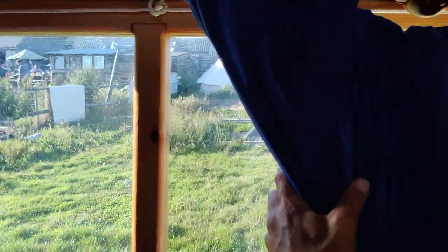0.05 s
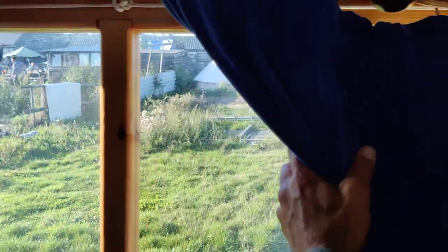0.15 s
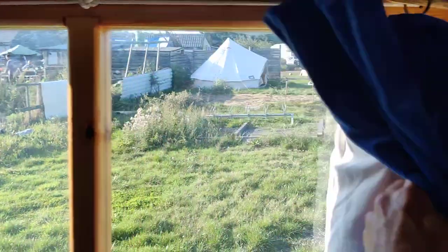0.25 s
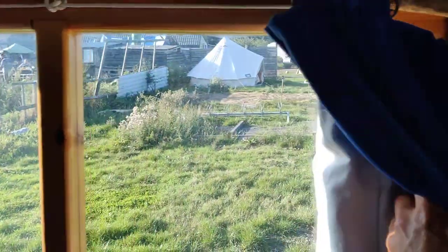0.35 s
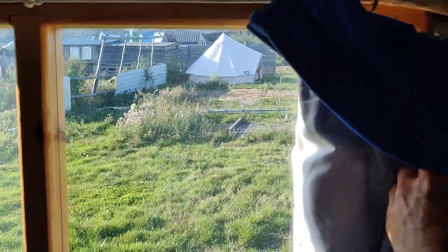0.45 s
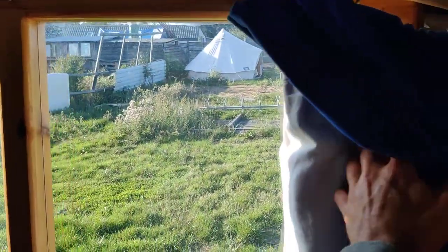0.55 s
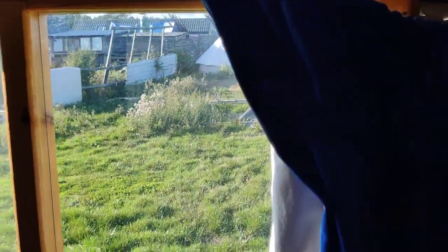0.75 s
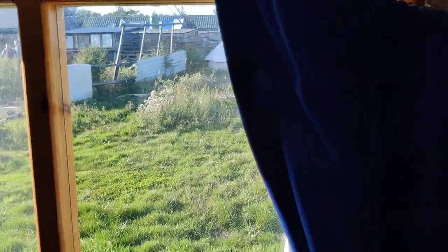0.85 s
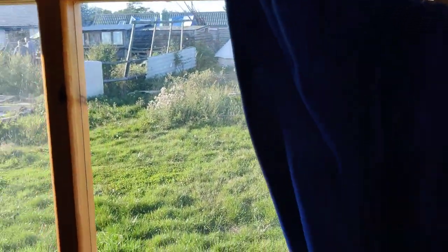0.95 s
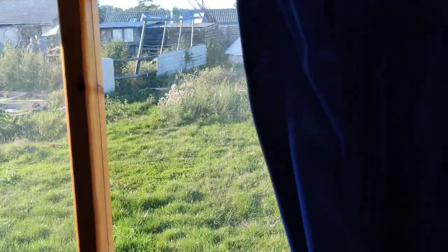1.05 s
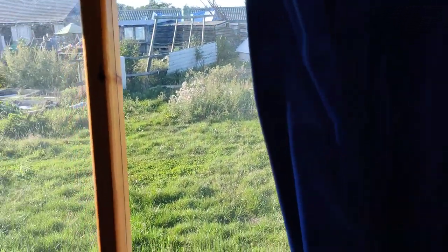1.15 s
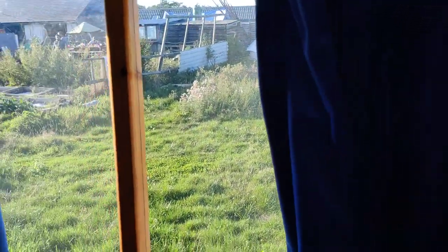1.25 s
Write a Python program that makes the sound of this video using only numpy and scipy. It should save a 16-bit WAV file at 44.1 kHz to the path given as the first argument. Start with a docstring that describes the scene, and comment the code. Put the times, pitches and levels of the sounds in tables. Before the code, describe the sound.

A curtain is pulled open close by in a small, dead room. Cloth swishes softly from 0.1 s with a light tug; at 0.2-0.38 s hooks scrape along the wooden pole with low rumble and thuds, metal clashing rapidly from 0.25 to 0.36 s. Small squeaky ticks follow at 0.41-0.5 s, with stray ones at 0.7 and 0.95 s. Faint fabric rustle fades by 1.1 s into quiet air, stirring slightly at the end.

```python
"""A curtain is pulled open, close by, in a small, dead room.
Cloth swish and low rumble (filtered noise) come first; then hooks scrape along a wooden pole (random jerks).
Tugs thud in the pole (dying sines), and the metal hooks clash as they bunch up (crack, chatter, ring, knock).
Hooks tick as they settle (short falling squeaks with a knock), while single folds snap or drag (noise bursts).
Still air (filtered noise) lies under it all."""
import sys
import numpy as np
from scipy import signal
from scipy.fft import rfft, irfft, next_fast_len
from scipy.io import wavfile
from scipy.ndimage import uniform_filter1d

SR = 44100
rng = np.random.default_rng(int(sys.argv[2]) if len(sys.argv) > 2 else 0)


def to_wav(sig):
    """Store sig (one row per channel, or 1-D mono) as 16-bit WAV at the path in sys.argv[1].

    Samples outside -1..1 are clipped; the rate is SR.
    """
    pcm = np.clip(np.atleast_2d(sig), -1, 1) * 32767
    pcm = np.round(pcm).astype(np.int16)
    wavfile.write(sys.argv[1], SR, pcm.T)  # frames by channels


N = 57330


def undb(db):
    """Decibels to gain."""
    return 10 ** (np.asarray(db) / 20)


def unit(x):
    """Scale to rms 1."""
    return x / np.sqrt(np.mean(x ** 2))


def clock():
    """Time of every sample in seconds."""
    return np.arange(N) / SR


def curve(rows):
    """Gain through points of (s, dB), linear in dB."""
    return undb(np.interp(clock(), *np.array(rows).T))


def decay(t60_s):
    """Envelope that falls 60 dB in t60_s."""
    return np.exp(-np.log(1000) * clock() / t60_s)


def pan(db):
    """Left and right gains; positive is louder on the left."""
    return undb(np.array([[db], [-db]]) / 2)


def convolve(x, response):
    """Play x through a response."""
    return signal.fftconvolve(np.atleast_2d(x), np.atleast_2d(response), axes=-1)[:, :N]


def colour(x, points):
    """Minimum-phase filter through points of (Hz, dB), by folding the cepstrum to positive time."""
    hz, db = np.array(points).T
    size = 2 * next_fast_len(N)
    bin_hz = np.maximum(np.arange(size // 2 + 1) * SR / size, 1)
    gain_db = np.interp(np.log(bin_hz), np.log(hz), db)
    cepstrum = irfft(np.log(undb(gain_db)))
    cepstrum[1:size // 2] *= 2
    cepstrum[size // 2 + 1:] = 0
    response = np.exp(rfft(cepstrum))
    return irfft(rfft(x, size) * response, size)[..., :N]


def blow(s):
    """A unit impulse at time s."""
    return 1. * (np.arange(N) == int(s * SR))


def noise():
    """Unrelated noise left and right."""
    return rng.standard_normal((2, N))


def burst(envelope):
    """Noise of unit energy under an envelope."""
    return unit(noise() * envelope) / np.sqrt(N)


def walk(rate_hz):
    """Random wander about zero, rms near 1, with rate_hz new values a second joined smoothly."""
    hold = int(SR / rate_hz)
    steps = np.repeat(rng.standard_normal(N // hold + 1), hold)
    return unit(uniform_filter1d(steps, hold)[:N])


def mode(hz, t60_s):
    """A dying sine; the higher it is, the more its phase differs between the sides."""
    diffuse_hz = 2310  # from here up the two phases are unrelated
    phase_turns = min(hz / diffuse_hz, 1) ** 2 * rng.random((2, 1))
    return decay(t60_s) * np.sin(2 * np.pi * (hz * clock() + phase_turns))


def ports(x):
    """The sound reaches the right side just after the left."""
    lag_s = 0.00016
    return np.array([x, np.roll(x, int(lag_s * SR))])


def pole_ring():
    """The pole and its frame ring in dying modes; those above the knee die faster."""
    # Each row: frequency in Hz, relative level in dB.
    pole_modes = [(110, -4.5), (137, 6.5), (428, 4.5), (464, 1), (683, -4), (1020, -2.5), (1245, -1),
                  (1372, -11), (1750, -8.5), (2230, -5)]
    t60_s, knee_hz = 0.099, 510
    return sum(undb(db) * mode(hz, t60_s * min(knee_hz / hz, 1) ** .5) for hz, db in pole_modes)


def still_air():
    """Steady filtered noise of the still air."""
    # Colour. Each row: frequency in Hz, gain in dB.
    air_colour = [(50, 4), (200, -11), (600, -25), (2000, -28.5), (11000, -41), (15000, -50.5)]
    air_db = -78
    return unit(colour(noise(), air_colour)) * undb(air_db)


def cloth():
    """Folds brush past each other: a grainy swish of noise whose level follows the cloth movement."""
    # Cloth movement. Each row: time in seconds, relative level in dB.
    movement = [(0, -19.5), (.09, -10), (.115, 6.5), (.15, -14), (.2, 5), (.37, -6), (.42, 5), (.55, -2),
                (.72, -1), (.90, 0), (.97, -11.5), (1.1, -20.5), (1.26, -18), (1.275, -8)]
    # Colour. Each row: frequency in Hz, gain in dB.
    swish_colour = [(90, -9), (250, -8.5), (450, 2), (1300, -4), (1900, -5), (4000, -7), (8000, -16.5),
                    (15000, -17)]
    cloth_db, grain_db, grain_hz = -65.5, 2, 1500
    fibres = noise() * undb(grain_db * walk(grain_hz))
    return unit(colour(fibres, swish_colour)) * curve(movement) * undb(cloth_db)


def rumble():
    """Low buffeting from the swinging curtain and the frame, nearly alike on both sides."""
    # Stirred air and frame. Each row: time in seconds, relative level in dB.
    rumble_curve = [(0, -59.5), (.09, -55.5), (.12, -47.5), (.2, -46), (.235, -27), (.31, -30.5),
                    (.34, -33), (.385, -32), (.415, -40), (.54, -47.5), (.63, -46.5), (.9, -52.5),
                    (1.22, -64), (1.27, -51.5)]
    # Colour. Each row: frequency in Hz, gain in dB.
    rumble_colour = [(12, -21), (24, 0), (39, 0.5), (76, -14.5), (112, -15.5), (190, -23.5), (400, -33),
                     (900, -58)]
    rumble_db, side_db = -2.5, -12.5
    gusts = colour(noise(), rumble_colour)
    power = uniform_filter1d(gusts ** 2, size=SR // 8)
    mid, side = gusts / np.sqrt(power)  # evens out the level
    both = mid + undb(side_db) * np.array([side, -side])
    return both * curve(rumble_curve) * undb(rumble_db)


def scrape(pole):
    """Hooks stick and slip on the wood: uneven little jerks come in surges, rasp and ring the pole."""
    # Sliding effort. Each row: time in seconds, relative level in dB.
    effort = [(.06, -56), (.108, -32.5), (.117, -22), (.135, -30), (.21, -23), (.225, -12), (.25, -8),
              (.28, -1), (.328, -3.5), (.372, -10), (.39, -39.5), (.47, -61), (.54, -60.5)]
    # Colour of the rasp. Each row: frequency in Hz, gain in dB.
    rasp_colour = [(100, -10.5), (280, -6), (450, -0.5), (800, -2), (1400, -6), (2400, -14), (4500, -17),
                   (8000, -30), (15000, -35)]
    slips_per_s, scatter_db = 1500, 3
    surges_per_s, surge_db = 110, 0.5
    rasp_db, pole_db = -31.5, -35
    strength = undb(scatter_db * np.clip(rng.standard_normal(N), -2, 2))
    slips = (rng.random(N) < slips_per_s / SR) * strength
    signs = np.sign(rng.standard_normal(N))
    slips = unit(slips * signs * undb(surge_db * walk(surges_per_s)))
    grit = ports(slips) + slips * noise()
    rasp = unit(colour(grit, rasp_colour)) * curve(effort) * undb(rasp_db)
    body = convolve(slips * curve(effort), unit(pole) / np.sqrt(N)) * undb(pole_db)
    return (rasp + body) * pan(db=2.5)


def bumps(pole):
    """Tugs of the curtain are soft pushes that ring mainly the low modes of the pole."""
    # Each row: time in seconds, relative level in dB.
    tugs = [(0.117, -1.5), (0.2212, 11), (0.2582, 12.5), (.312, 9)]
    # Colour of a push. Each row: frequency in Hz, gain in dB.
    push_colour = [(130, -1.5), (450, -7), (2200, -15)]
    bump_db = -44
    pushes = sum(undb(db) * blow(s) for s, db in tugs)
    return convolve(colour(pushes, push_colour), pole) * undb(bump_db) * pan(db=1.5)


def chatter():
    """A quick, uneven run of recontacts with unit energy, held in strength before dying away."""
    contacts_per_s, hold_s, t60_s = 2200, 0.0054, 0.012
    contacts = (rng.random((2, N)) < contacts_per_s / SR) * np.sign(noise())
    envelope = np.minimum(decay(t60_s) * undb(60 * hold_s / t60_s), 1)
    return unit(contacts * envelope) / np.sqrt(N)


def knock(pole, contact):
    """A hook strikes the wood: a short clack and the ring of the pole."""
    # Colour of the clack. Each row: frequency in Hz, gain in dB.
    clack_colour = [(120, -11), (270, -19.5), (440, 6), (680, -2.5), (1100, -1), (1500, -2.5), (2200, 2),
                    (3700, -7), (5000, -27.5), (12000, -45.5)]
    pole_db = -41
    return colour(contact, clack_colour) + undb(pole_db) * pole


def hook_ring(note_hz):
    """A struck hook rings in modes that all hooks share, slightly detuned, and in its own note."""
    # Each row: frequency in Hz, relative level in dB, 60 dB decay in seconds.
    hook_modes = [(2093, -11.5, .08), (2982, -9, 0.043), (3530, -13, 0.03), (3630, -8, .04),
                  (4298, -11.5, 0.04), (4440, -8.5, 0.0046), (5970, -14.5, 0.0095), (6854, -3, 0.014),
                  (8320, -9.5, 0.0086), (11570, -4, 0.021), (11750, -11, 0.024), (12460, -1, 0.0068)]
    detune_share, scatter_db = 0.0037, 3.5  # random spread: no two hooks or points of contact are alike
    note_db, note_t60_s = 5.5, 0.024
    ring = undb(note_db) * mode(note_hz, note_t60_s)
    for hz, db, t60_s in hook_modes:
        gain = undb(db + scatter_db * rng.standard_normal())
        ring = ring + gain * mode(hz * (1 + detune_share * rng.standard_normal()), t60_s)
    return ring


def hooks(pole):
    """Each clash is a crack, a short chatter of recontacts, the ring of the hook and a knock on the pole."""
    # Each row: start in seconds, level in dB, brightness in dB, own note of the hook in Hz,
    # ring in dB, knock on the pole in dB, left-right balance in dB (levels are relative).
    clashes = [(.2536, -9, -14.5, 3540, 6.5, 14, -5.5), (.2679, -16.5, 1.5, 2430, -7.5, 20.5, 2.5),
               (.2764, -12, -5.5, 3200, -5, 12, 0), (.2878, -11, -9.5, 4280, -9.5, 7.5, 0),
               (.3012, 0.5, -7, 5852, -1.5, -14, 5.5), (.3074, -5.5, -20, 4075, -1.5, 0, 1.5),
               (0.3124, -20.5, -13, 3054, -9.5, 21.5, 0), (.3246, 1.5, -2.5, 4307, -3, -4, 5),
               (.3278, -8, 2.5, 3997, 8.5, -6, -0.5), (.3296, -13, 11, 4023, 0.5, -2.5, -1),
               (.3351, -8.5, -5, 3890, 11, -1, 0), (.3468, -10.5, -9.5, 3665, -6.5, 3.5, -3),
               (.3598, -8.5, -2.5, 3305, -0.5, 1, 0)]
    # Colour of the contact. Each row: frequency in Hz, gain in dB.
    crack_colour = [(150, -20), (500, -10), (1200, 3), (2400, 1), (3600, 5), (6000, -3.5), (7600, -10),
                    (9800, -17), (12300, -8.5), (15500, -13)]
    # Balance of the metal. Each row: frequency in Hz, left over right in dB.
    metal_pan = [(300, 14), (1500, -4), (4000, 2.5), (7500, 11), (10000, 15), (13000, 2.5)]
    # Brightness shelf: start and end of its slope in Hz.
    shelf_hz = (6500, 11500)
    crack_db, chatter_db, ring_base_db = -2.5, 6.5, -22
    knock_base_db, knock_chatter_db = -.5, -2.5
    out = 0
    for s, db, bright_db, note_hz, ring_db, knock_db, pan_db in clashes:
        contact = undb(crack_db) * ports(blow(0)) + undb(chatter_db) * chatter()
        metal = colour(contact, crack_colour) + undb(ring_base_db + ring_db) * hook_ring(note_hz)
        metal = np.array([colour(channel, [(hz, sign * balance_db / 2) for hz, balance_db in metal_pan])
                          for channel, sign in zip(metal, (1, -1))])
        wood_contact = ports(blow(0) + undb(knock_chatter_db) * chatter()[0])
        wood = undb(knock_base_db + knock_db) * knock(pole, wood_contact)
        push = colour(undb(db) * blow(s), [(shelf_hz[0], 0), (shelf_hz[1], bright_db)])
        out = out + convolve(push, metal + wood) * pan(pan_db)
    return out


def ticks(pole):
    """Hooks damped by the hanging cloth slip one by one: a tiny falling squeak and a clean knock on the pole."""
    # Each row: start in seconds, relative level in dB, final pitch in Hz, relative knock on the pole in dB.
    settling = [(0.4096, -11.5, 2970, 2.5), (0.4241, -13.5, 2890, 1.5), (0.439, -12, 2970, 3),
                (0.4541, -13, 3050, 5), (0.4730, -13, 2900, 3.5), (0.5001, -14, 2960, 8),
                (0.698, -19, 2910, 0.5), (0.9475, -21.5, 3720, -7)]
    squeak_db, length_s, attack_s, pan_db = -35.5, 0.0033, 0.00082, -11
    upper_hz, upper_db, knock_base_db = 6700, -11, -12.5
    glide_share, glide_s = 0.52, 0.00058  # starts sharp by this share and falls to its pitch
    t = clock()
    rise = np.minimum(t / attack_s, 1) ** 2
    envelope = rise * np.exp(-(t / length_s) ** 4)
    radians_per_hz = 2 * np.pi * (t + glide_share * glide_s * (1 - np.exp(-t / glide_s)))
    upper = undb(upper_db) * np.sin(2 * np.pi * upper_hz * t)
    tap = knock(pole, ports(blow(attack_s)))
    out = 0
    for s, db, hz, knock_db in settling:
        squeak = envelope * (np.sin(hz * radians_per_hz) * pan(pan_db) + upper)
        tick = undb(squeak_db) * squeak + undb(knock_base_db + knock_db) * tap
        out = out + convolve(undb(db) * blow(s), tick)
    return out


def folds():
    """Single folds snap or drag over each other: bell-shaped bursts of grainy noise, each with its own band."""
    # Each row: centre in seconds, half length in seconds, relative level in dB, centre frequency in Hz.
    fold_rows = [(.5135, .0007, -58.5, 8000), (.655, 0.018, -68, 670), (0.776, .012, -64, 1300),
                 (0.802, 0.029, -64, 526), (.882, 0.048, -70, 4460)]
    skirt_db = -28  # two octaves from the centre
    grain_db, grain_hz = 1.5, 790
    out = 0
    for s, half_s, db, hz in fold_rows:
        rough = noise() * undb(grain_db * walk(grain_hz))
        grain = colour(rough, [(hz / 4, skirt_db), (hz, 0), (hz * 4, skirt_db)])
        out = out + undb(db) * unit(grain) * np.exp(-2 * ((clock() - s) / half_s) ** 2)
    return out


def room(direct):
    """Reverberation of a small, dead room: a dense, quickly dying noise response."""
    t60_s, room_db, onset_s = 0.16, -16.5, 0.002
    response = burst(decay(t60_s) * np.minimum(clock() / onset_s, 1) ** 2)
    return undb(room_db) * convolve(direct, response)


def scene():
    """Hooks on the pole with their room, the curtain and still air."""
    pole = pole_ring()
    curtain = (cloth() + rumble() + bumps(pole) + folds()) * pan(db=2.5)
    direct = scrape(pole) + hooks(pole) + ticks(pole)
    return direct + room(direct) + curtain + still_air()


def record(dry):
    """A steep elliptic low-pass cuts the top."""
    top_hz, ripple_db, stop_db = 15900, .2, 70
    return signal.sosfilt(signal.ellip(8, ripple_db, stop_db, top_hz, fs=SR, output="sos"), dry)


dry = scene()
out = record(dry)
to_wav(out)
```